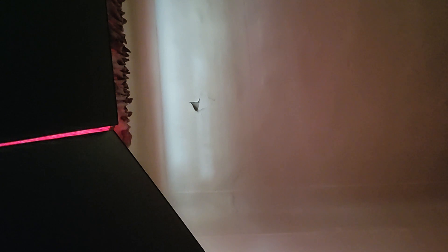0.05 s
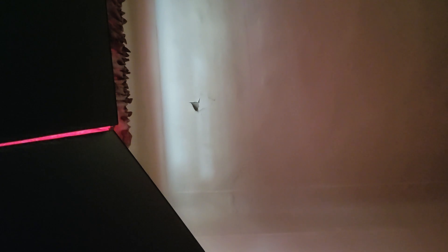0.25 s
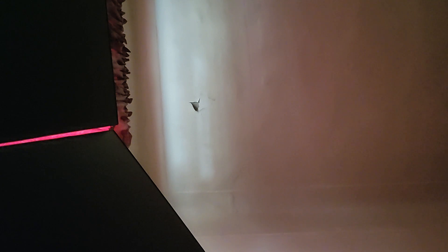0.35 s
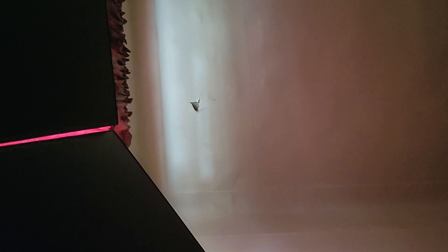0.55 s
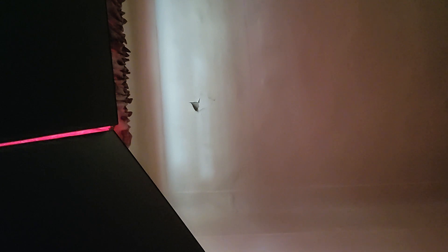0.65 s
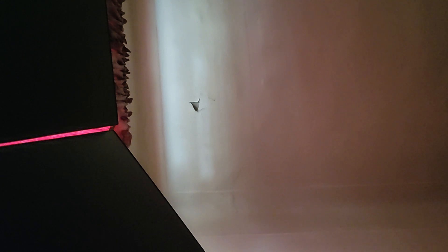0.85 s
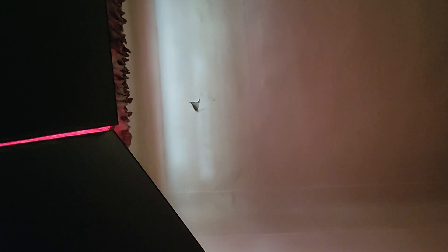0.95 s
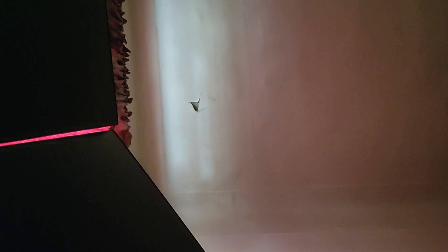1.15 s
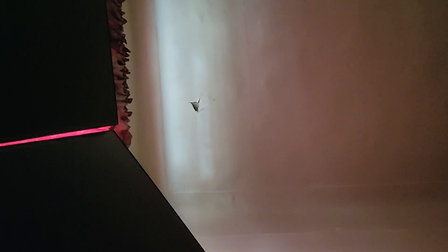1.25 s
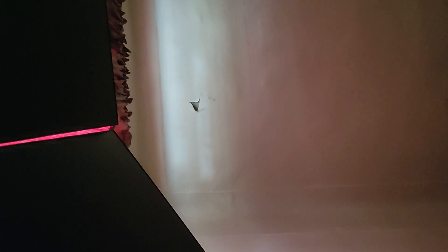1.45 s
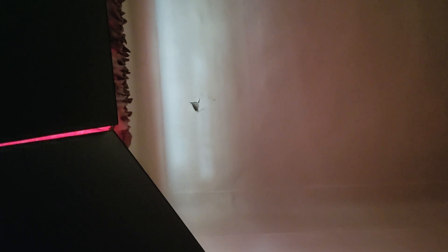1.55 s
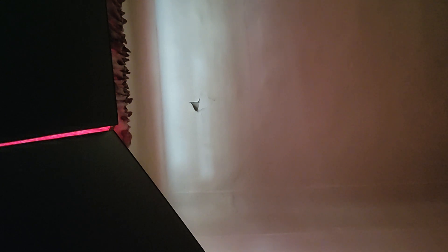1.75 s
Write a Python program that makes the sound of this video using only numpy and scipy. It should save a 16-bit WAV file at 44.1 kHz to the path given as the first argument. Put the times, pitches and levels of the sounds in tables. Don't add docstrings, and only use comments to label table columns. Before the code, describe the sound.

Footfalls from an upper floor: small low thumps from 0.2 seconds, a strong deep thud around 0.43, then a heavier knock and longer boom at 0.55. Weaker bumps follow until another cluster at 1.15-1.35. At 1.47 a brighter, woody double slap rings the room briefly, then it settles. Quiet low hum, house rumble, faint hiss and tiny crackles continue throughout, close to a phone microphone.

```python
import sys
import numpy as np
from scipy import signal
from scipy.fft import rfft, irfft, next_fast_len
from scipy.io import wavfile
from scipy.ndimage import map_coordinates

SR = 44100
rng = np.random.default_rng(int(sys.argv[2]) if len(sys.argv) > 2 else 0)


def store_pcm(level_fs):
    pcm = np.round(np.clip(level_fs, -1, 1) * 32767).astype(np.int16)
    wavfile.write(sys.argv[1], SR, np.atleast_2d(pcm).T)


def elevation(decibels):
    levels = np.asarray(decibels, float)
    return 10 ** (levels / 20)


N = 79380
PUFF = SR // 3


def along(points, hz):
    f, v = np.transpose(points)
    return np.interp(np.log(hz + 1), np.log(f + 1), v)


def wobble(rate):
    knots = rng.standard_normal(int(N * rate / SR) + 4)
    return map_coordinates(knots, [np.arange(N) * rate / SR])


def filtered(x, response):
    m = next_fast_len(N + SR // 2)
    return irfft(rfft(x, m) * response(np.fft.rfftfreq(m, 1 / SR)), m)[..., :N]


def peaks_db(resonances, hz):
    return sum(db / (1 + (2 * (hz - centre) / width) ** 2) for centre, width, db in resonances)


def place(out, start_s, x):
    return out + np.pad(x, ((0, 0), (round(start_s * SR), N)))[:, :N]


def ports(x):
    # hz, lead_rad
    left_leads = [(60, .3), (300, .1), (540, -.5), (720, -1.0), (1000, -2.1), (1400, -1.9), (2100, -.7),
                  (3000, .3)]
    return filtered(x, lambda hz: np.exp(1j * np.outer([.5, -.5], along(left_leads, hz))))


def burst(tone_db, decay, rise_s, alike):
    a, b = rng.standard_normal((2, PUFF))
    angle = np.arccos(np.clip(alike, 0, 1)) / 2
    pair = [np.cos(angle) * a + np.sin(angle) * b, np.cos(angle) * a - np.sin(angle) * b]
    hz, t, z = signal.stft(pair, SR, nperseg=1024, noverlap=896)
    fall_db = -60 * t / along(decay, hz)[:, None]
    z = z * elevation(tone_db(hz)[..., None] + fall_db)
    x = signal.istft(z, SR, nperseg=1024, noverlap=896)[1][:, :PUFF]
    x = x * np.clip(np.arange(PUFF) / SR / rise_s, 0, 1) ** 2
    return x / np.sqrt(2 * np.mean(x[:, :SR // 50] ** 2))


def damped_mode(hz, t60_s, rise_s):
    t = np.arange(PUFF) / SR
    swell = elevation(-60 * t / t60_s) * (1 - np.exp(-(t / rise_s) ** 2))
    return swell / swell.max() * np.sin(2 * np.pi * hz * t)


def knocks():
    # start_s, thud_db, tilt_db_per_octave, ring_hz, ring_over_thud_db
    contacts = [(0.213, -66, -7, 250, -3), (0.329, -62, -3, 323, -6), (.375, -57.5, 0.5, 708, -11.5),
                (.385, -53.5, -2, 196.3, 0), (.455, -58.5, -9.5, 315, -2.5), (.485, -60.5, -5.5, 270, 2.5),
                (.538, -61, -3.5, 419, -12), (0.546, -49.5, 2, 549, -4.5), (0.553, -57, -3.5, 279, 3.5),
                (.625, -62.5, -2, 320, -4), (0.68, -61.5, -11, 373, -24), (.795, -63.5, -2.5, 266.5, 1),
                (0.999, -68.5, 0.5, 301.7, -8), (1.151, -52, -3.5, 541, -16.5), (1.156, -65, 2, 685, -3.5),
                (1.252, -52.5, 1, 723, -9.5), (1.262, -54, -2, 194.5, 9), (1.268, -54, 1, 516, -9),
                (1.33, -57, -1.5, 310, -13.5), (1.469, -61, 1.5, 324.5, 16), (1.503, -56, 0, 264.7, 7),
                (1.536, -60, -13.5, 265.5, 5)]
    # hz, level_db
    ceiling = [(59, -38.5), (100, -10.5), (142, -12), (436, -28.5), (566, -33), (656, -31.5), (777, -32.5),
               (953, -47), (1400, -52), (1950, -116), (3300, -120)]
    # centre_hz, width_hz, gain_db
    panels = [(265, 40, 4), (540, 50, 2), (730, 60, 1), (180, 30, 4)]
    # hz, t60_s
    thud_decay = [(100, .3), (300, .27), (600, .16), (1000, .14)]
    rise_s, ring_cycles = .011, 36
    out = np.zeros((2, N))
    for start_s, thud_db, tilt_db, ring_hz, ring_db in contacts:
        def tone(hz):
            return along(ceiling, hz) + peaks_db(panels, hz) + tilt_db * np.log2((hz + 50) / 300)
        thud = burst(tone, thud_decay, rise_s, alike=.85)
        ring = elevation(ring_db) * damped_mode(ring_hz, ring_cycles / np.sqrt(ring_hz * 300), rise_s)
        out = place(out, start_s - rise_s / 2, elevation(thud_db) * (thud + ring))
    return out


def creaks():
    # start_s, peak_db, pitch_hz, t60_s
    modes = [(0.28, -71, 340, 0.12), (.415, -79.5, 760, 0.14), (.553, -73, 900, 0.12),
             (.545, -61.5, 380, 0.17), (.55, -53, 175, .2), (.56, -59, 300, .2), (.54, -72, 1040, .08),
             (.378, -70.5, 690, 0.096), (.382, -70.5, 540, 0.089), (1.25, -58.5, 280, 0.14),
             (1.285, -62, 310, .15), (.575, -84.5, 1160, 0.092), (.835, -79.5, 541, 0.19),
             (1.23, -79.5, 1190, 0.065), (1.265, -81, 973, 0.083), (1.315, -82, 520, 0.17),
             (1.731, -73.5, 302, .15), (1.36, -58, 125, .2), (1.385, -70.5, 320, 0.18),
             (1.16, -71, 550, .15), (1.1, -70.5, 255, .15), (1.255, -73, 520, 0.18),
             (1.464, -55.5, 2990, 0.08), (1.476, -61, 2080, 0.13), (1.464, -80, 1330, 0.079),
             (1.466, -60, 888, 0.15)]
    out = np.zeros((2, N))
    for start_s, peak_db, hz, t60_s in modes:
        out = place(out, start_s, elevation(peak_db) * damped_mode(hz, t60_s, .0097) * np.ones((2, 1)))
    return out


def booms(swells, right_db, right_dies):
    right_lag_s, overtone_db = .0005, -30
    hold = .22
    lead_spread_rad = .35
    t = np.arange(N) / SR - np.array([[0], [right_lag_s]])
    out = np.zeros((2, N))
    for peak_s, peak_db, hz, rise_s, t60_s in swells:
        near = slice(max(0, round(peak_s * SR) - PUFF), round(peak_s * SR) + PUFF)
        u = t[:, near] - peak_s
        rise = np.exp(-(u / rise_s) ** 2)
        since_top = np.hypot(u, hold * t60_s) - hold * t60_s
        fall = elevation(-60 * since_top / np.array([[t60_s], [t60_s * right_dies]]))
        phase = 2 * np.pi * hz * u + [[0], [lead_spread_rad * rng.standard_normal()]]
        wave = np.cos(phase) + elevation(overtone_db) * np.cos(1.7 * phase)
        out[:, near] += elevation(peak_db) * np.where(u < 0, rise, fall) * wave
    return out * elevation([[3], [right_db]])


def slap():
    # start_s, peak_db
    (start_s, peak_db), = [(1.468, -47)]
    # hz, level_db
    slap_tone = [(88, -55), (150, -11), (346, -10), (529, -16.5), (1340, -14), (1720, -18.5), (3050, -17.5),
                 (5060, -23.5), (7500, -43.5), (9500, -56), (16500, -120)]
    # centre_hz, width_hz, gain_db
    rings = [(320, 63, 2.5), (890, 42, 8.5), (1340, 55, 5), (2770, 49, -3), (3700, 96, 3.5),
             (4010, 71, 7.5)]
    # hz, t60_s
    direct_decay = [(200, 0.23), (1000, 0.12), (3000, 0.12), (8000, 0.032)]
    # hz, level_db
    right_over_left = [(200, -7.5), (1000, 3.5), (2000, 4), (3000, 14.5), (8000, 0.5)]
    # hz, t60_s
    room_decay = [(200, .28), (1000, .3), (3000, .42), (6000, .5)]

    def tone(hz):
        return along(slap_tone, hz) + peaks_db(rings, hz)

    def lean(hz):
        return np.outer([-.5, .5], along(right_over_left, hz))

    def direct():
        return burst(lambda hz: tone(hz) + lean(hz), direct_decay, rise_s=.01, alike=.55)

    def room_tone(hz):
        return tone(hz) + .068 * lean(hz) - 2 * np.log2(hz / 500 + 1)

    room = elevation(-11.5) * burst(room_tone, room_decay, rise_s=.019, alike=.14)
    scuff = burst(lambda hz: -14 * np.log2((hz + 1) / 3500) ** 2, [(1000, .1)], rise_s=.027, alike=.81)
    out = place(np.zeros((2, N)), start_s - .003, elevation(peak_db) * (direct() + room))
    out = place(out, start_s + .007, elevation(peak_db - 6) * direct())
    return place(out, start_s - .026, elevation(peak_db - 30) * scuff)


def hum():
    # pitch_hz, rms_db
    lines = [(59.93, -57), (153.7, -64.5), (179.8, -68.5), (299.7, -81), (419.5, -90), (539.4, -92),
             (767, -97)]
    t = np.arange(N) / SR
    right_lag = np.array([[0], [-.1]])
    out = np.zeros((2, N))
    for hz, rms_db in lines:
        level = elevation(rms_db + .8 * np.sqrt(hz / 100) * wobble(4.1))
        drift = .05 * (hz / 100) ** .89 * wobble(9.7)
        out += level * np.sin(2 * np.pi * hz * t + drift + rng.uniform(0, 6.03) + right_lag)
    return np.sqrt(2) * out * elevation([[3], [-11]])


def rush(spectrum, level_db, seed=None):
    # hz, correlation
    likeness = [(60, 0.15), (180, .4), (550, 0.17), (1650, 0.18), (4970, 0.041), (15000, 0.21)]
    # hz, left_over_right_db
    left_over_right = [(60, 7.5), (150, 4.5), (380, 4), (1150, -0.5), (2380, 9.5), (5980, 10.5),
                       (15000, 10)]

    def mid_side(hz):
        angle = np.arccos(np.clip(along(likeness, hz), -1, 1)) / 2
        return elevation(along(spectrum, hz)) * [np.cos(angle), np.sin(angle)]

    def sensitivity(hz):
        return elevation(np.outer([.5, -.5], along(left_over_right, hz)))

    pair = rng.standard_normal((2, N)) if seed is None else seed
    mid, side = filtered(pair, mid_side)
    both = filtered(np.array([mid + side, mid - side]), sensitivity)
    return elevation(level_db) * both / both.mean(axis=0).std()


def crackling_air():
    # start_s, peak_db
    ticks = [(0.0712, -75), (0.1416, -76.5), (0.1635, -78.5), (0.1825, -75), (0.1999, -75.5), (0.2224, -73),
             (0.3361, -70.5), (0.409, -80.5), (0.4623, -78), (0.5082, -74.5), (0.5322, -78),
             (0.6025, -72.5), (0.7477, -75.5), (0.7921, -79.5), (0.8714, -75.5), (0.9053, -78.5),
             (0.9507, -75), (0.9956, -75), (1.0839, -77), (1.1054, -76.5), (1.1278, -70.5), (1.271, -71),
             (1.3219, -73), (1.4042, -71), (1.5623, -72), (1.6387, -75.5), (1.6696, -80), (1.699, -79),
             (1.7609, -74.5)]
    # hz, level_db
    air = [(4410, -55), (7500, -11), (8490, -15.5), (10200, -9.5), (11000, -10.5), (12900, -0.5),
           (15500, -6.5)]
    t = np.arange(N) / SR
    hits = rng.random(N) < 60 / SR * elevation(3 * wobble(20))
    size = hits * elevation(6 - 8 * rng.random(N))
    for start_s, peak_db in ticks:
        size[round(start_s * SR) + 24] = elevation(peak_db + 82.5)
    gate = 1 + np.convolve(size, np.hanning(110), "same") * [[1], [.5]]
    growth_db = 2 * (t - .27)
    return rush(air, -88.5, gate * rng.standard_normal((2, N))) * elevation(growth_db + 1.8 * wobble(14))


def rumble_and_hiss():
    # hz, level_db
    rumble = [(12, -32), (20, -0.5), (59, -3.5), (109, -9), (165, -10), (227, -23.5), (308, -19),
              (468, -33), (1100, -45), (1430, -70), (2420, -120)]
    # hz, level_db
    hiss = [(530, -47.5), (900, -38.5), (1190, -10.5), (1720, 4.5), (2140, 0), (2360, -1), (4770, 2),
            (6550, -12), (9000, -32), (11700, -49), (19800, -120)]
    low = rush(rumble, -63.5) * elevation(.41 * wobble(3.7))
    return low + rush(hiss, -82.5) * elevation(.46 * wobble(7.9))


def scene():
    # peak_s, peak_db, pitch_hz, rise_s, t60_s
    steps = [(.12, -54, 72, 0.012, 0.091), (.207, -43, 74.6, 0.026, 0.099), (.265, -43, 59.8, 0.011, 0.12),
             (.325, -47, 67.5, 0.02, .12), (.353, -45, 66.2, 0.01, .1), (.429, -31, 77.5, 0.018, 0.049),
             (.465, -45, 88.4, 0.019, 0.093), (.524, -47, 86.2, 0.0073, 0.054),
             (.69, -47, 62, 0.018, 0.093), (.722, -51.5, 64, .012, 0.14), (.897, -51, 63.5, 0.031, 0.071),
             (.96, -56.5, 63.7, 0.024, 0.12), (1.04, -47, 75.6, 0.019, 0.13),
             (1.111, -54.5, 62, .012, 0.071), (1.152, -43, 74.5, 0.0079, .07),
             (1.182, -38, 81.3, 0.018, 0.19), (1.235, -48, 79.7, 0.014, .1), (1.307, -32, 82, 0.018, 0.09),
             (1.383, -51.5, 81.5, 0.018, .08), (1.412, -51, 79.3, 0.0088, 0.094),
             (1.438, -47.5, 74.4, 0.0093, 0.075), (1.597, -56, 69, 0.014, 0.066),
             (1.727, -59, 68, 0.011, 0.1), (1.548, -41, 67, 0.013, 0.053), (1.694, -60, 67.6, 0.059, 0.17)]
    # peak_s, peak_db, pitch_hz, rise_s, t60_s
    landings = [
        (.5455, -36, 102, 0.012, 0.084),
        (.5615, -32.5, 59.63, .01, 0.27),
        (1.265, -39.5, 66.2, 0.022, 0.15),
        (1.483, -36, 68, 0.012, 0.066),
    ]
    low = booms(steps, right_db=-8, right_dies=.29) + booms(landings, right_db=-2.5, right_dies=.65)
    overhead = ports(knocks() + creaks() + slap())
    return overhead + low + hum() + rumble_and_hiss() + crackling_air()


def roll_off(x):
    return signal.sosfilt(signal.butter(12, 15620, fs=SR, output="sos"), x)


def record(dry):
    mix = filtered(dry, lambda hz: hz < 15800)
    return roll_off(mix)


dry = scene()
out = record(dry)
store_pcm(out)
```